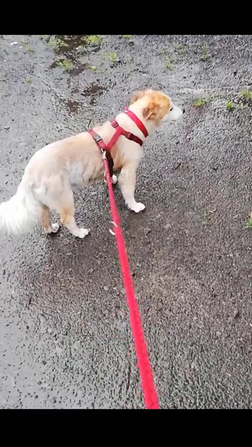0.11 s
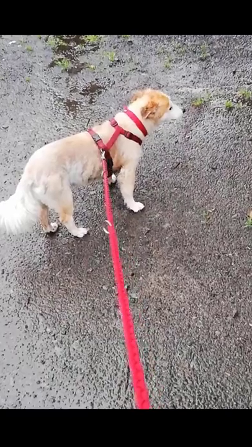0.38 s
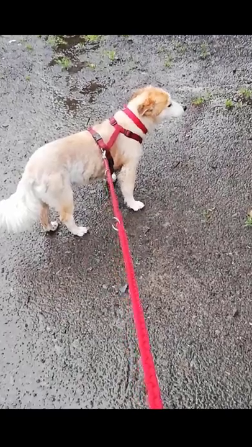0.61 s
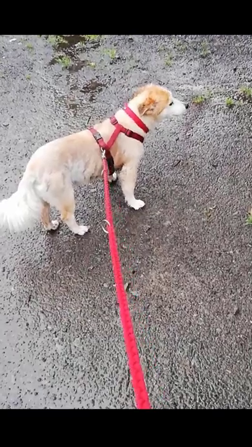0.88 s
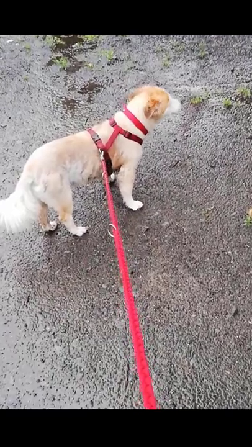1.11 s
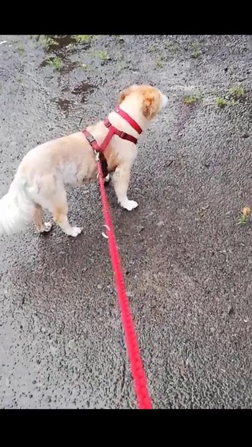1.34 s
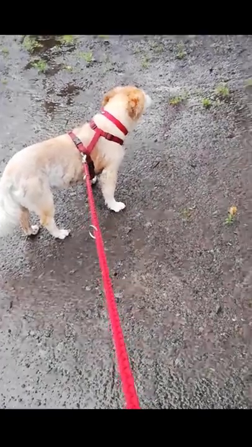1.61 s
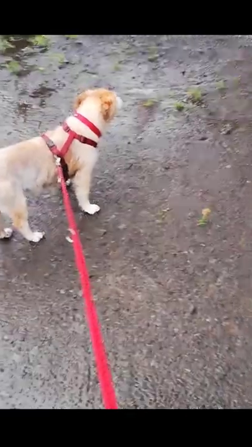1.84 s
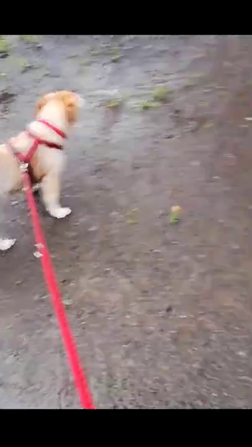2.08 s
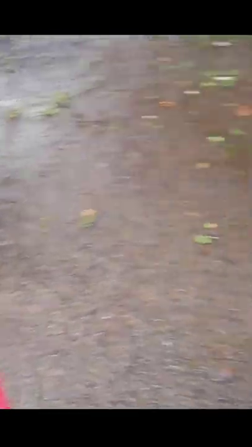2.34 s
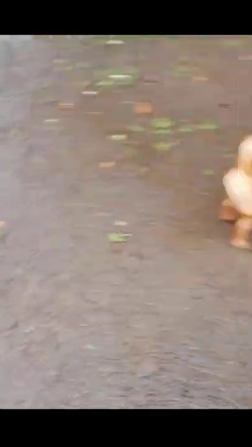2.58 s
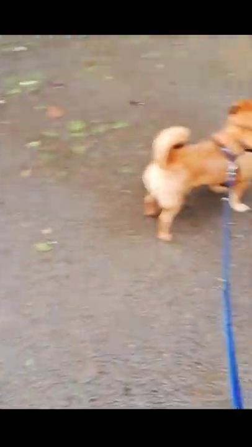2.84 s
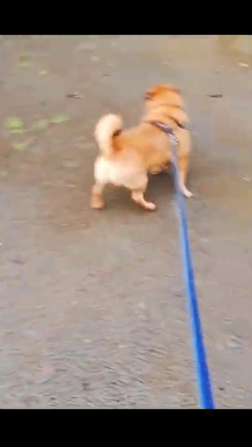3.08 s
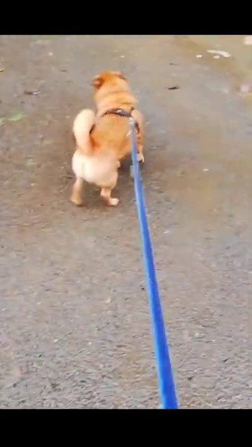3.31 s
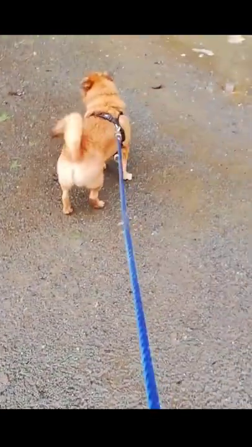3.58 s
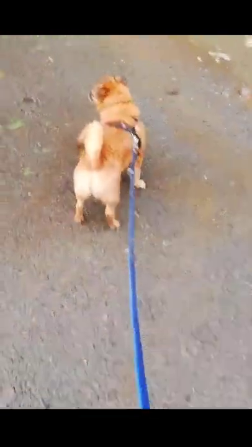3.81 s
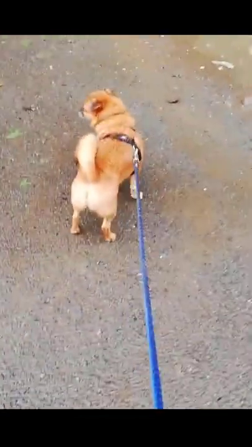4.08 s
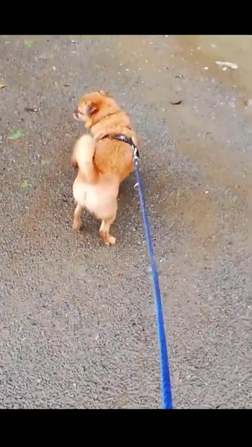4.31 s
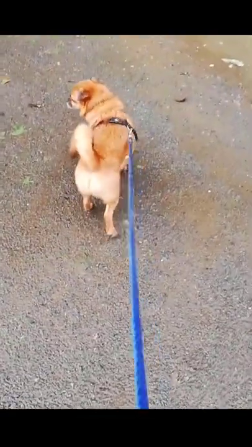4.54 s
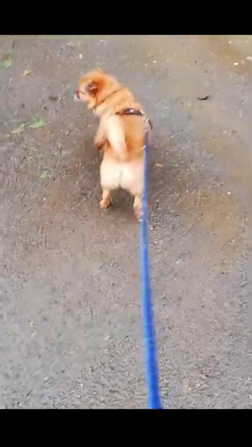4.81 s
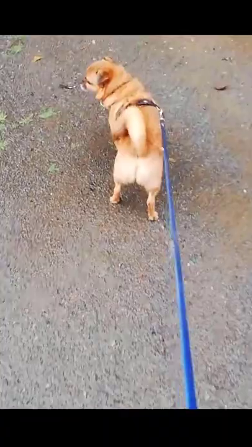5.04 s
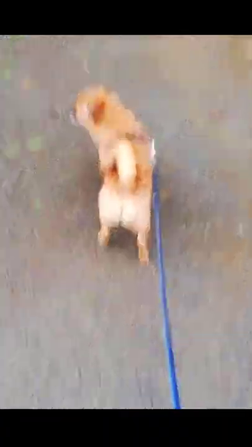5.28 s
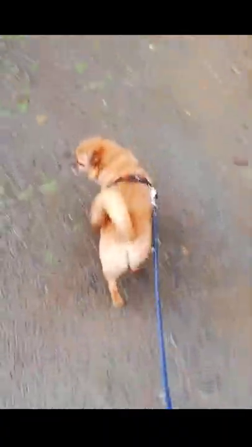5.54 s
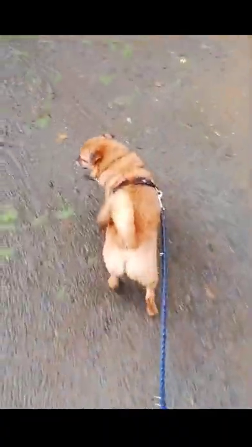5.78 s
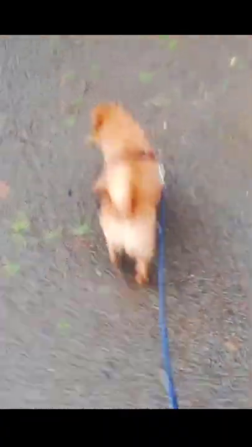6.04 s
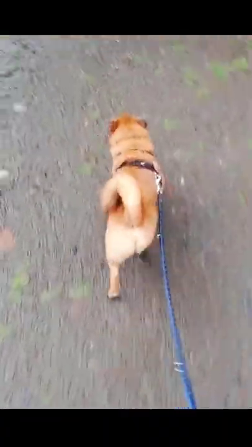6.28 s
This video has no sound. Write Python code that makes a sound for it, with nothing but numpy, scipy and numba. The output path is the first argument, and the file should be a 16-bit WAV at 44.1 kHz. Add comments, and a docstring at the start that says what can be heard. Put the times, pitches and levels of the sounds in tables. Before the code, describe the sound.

Steady rain hisses and patters on wet pavement, with sharp near drop ticks, early handling thumps on the microphone, and a brief low wind rumble late.

```python
"""Rain on wet asphalt

Steady rain around a hand-held phone with two microphone ports: countless far drops are shaped noise and
a patter of grains, near drops tick as short rings with a fizz. Low noise rumbles as air and one gust
buffets the ports. Early on, fingers press on the ports as pressure jumps that drive the limiter, which
ducks the rain; one hard tap follows, and faint low taps come later."""
import sys
import numpy as np
from scipy import signal
from scipy.fft import rfft, irfft, next_fast_len
from scipy.io import wavfile
from scipy.ndimage import uniform_filter1d
from numba import njit

SR = 44100
rng = np.random.default_rng(int(sys.argv[2]) if len(sys.argv) > 2 else 0)


def persist_wave(psi):
    """Save psi, clipped to +-1, as 16-bit WAV."""
    counts = np.round(np.clip(psi, -1, 1) * 32767).astype(np.int16)
    wavfile.write(sys.argv[1], SR, np.atleast_2d(counts).T)


def convert_level_to_amplitude(level_db):
    """Map a level in decibels to its linear amplitude factor."""
    exponent = np.asarray(level_db, float) / 20
    return 10 ** exponent


N = 282237  # samples in the scene
SIZE = next_fast_len(N)  # samples in a noise spectrum
FREQ = np.maximum(np.arange(SIZE // 2 + 1) * SR / SIZE, 1)  # Hz of each bin
PORT_HZ = 9800  # ring of the port cavity

# How the rain swells and dulls. Each row: time in seconds, overall level in dB,
# lift in dB of the bands centred under 2.5 kHz before the overall level is set.
RAIN_LEVELS = [(0.06, -25, 5.5), (0.14, -29.5, 1.5), (0.24, -31, 3.5), (0.5, -30.5, 1), (0.65, -29, 2.5),
               (1.18, -27, 2.5), (1.5, -28, 0.5), (2.0, -26.5, 1.5), (2.5, -27, -0.5), (2.88, -27.5, 0),
               (3.03, -25.5, -2), (3.4, -26.5, 4), (3.7, -27, -1), (4.3, -27, 1), (5.2, -26.5, -0.5),
               (5.6, -28.5, -0.5), (5.96, -24.5, 0), (6.15, -28, 0.5), (6.4, -24.5, -1.5)]
# Brief lifts of the rain hiss around 3.5 kHz: two clear swishes and two slight random swells.
# Each row: centre in seconds, lift in dB, half width in seconds.
MIDDLE_LIFTS = [(1.98, 3.5, 0.074), (3.72, 2, 0.052), (4.5, 1.5, .04), (5.96, 6, 0.036)]
# Tone of the hiss. Each row: frequency in Hz, relative density in dB per Hz.
HISS_TONE = [(150, -12), (250, -6), (360, -6), (519, -3.5), (845, -3.5), (1240, -2), (1530, -2), (1980, -1),
             (2360, -4), (3650, -2.5), (6250, -5), (9490, -3), (11500, -9), (14900, -14.5), (16000, -20)]
# Tilt of the rain between the ports. Each row: frequency in Hz, left minus right in dB.
PORT_TILT = [(200, 1), (480, -4), (820, -2.5), (1500, -3.5), (3000, -1.3), (6500, -1), (9500, 5.5),
             (12000, 0)]
# How alike the ports hear a noise. Each row: frequency in Hz, share of the left noise in the right (0-1).
PORT_LIKENESS = [(40, .985), (130, .96), (300, .74), (600, .54), (1000, .24), (1400, .3), (2500, .08),
                 (9000, .06)]
# How far the right port is ahead. Each row: frequency in Hz, phase lead in radians.
RIGHT_PHASE_LEAD = [(20, 0), (130, .12), (340, .7), (520, 2.6), (730, 3.3), (1290, 6.3), (1700, 6.7)]
# The clearest near drops. Each row: time in seconds, thud envelope peak in dB, thud pitch in Hz,
# edge envelope peak in dB, left minus right in dB.
CLEAR_DROPS = [(0.1459, -29, 2410, -27, -8), (0.222, -11, 1850, -29, -2.5), (0.464, -16.5, 950, -28, -12),
               (0.4881, -24, 5430, -11, -1.5), (0.5567, -10, 1770, -33, -11), (0.6158, -27, 4650, -5, -11),
               (0.6253, -24, 3400, -15, 5), (0.7338, -10, 980, -15, -14.5), (0.8095, -16, 1540, -12, -1),
               (0.8993, -27, 4220, -2.5, 2.5), (1.019, -15, 1630, -9, -1), (1.0964, -12, 1290, -13, -3.5),
               (1.2435, -10.5, 1250, -14, -1.5), (1.332, -12, 960, -25, -14.5),
               (1.4921, -11, 3450, -22, -14), (1.5535, -10.5, 1850, -11, -12), (1.924, -17, 4780, -11, -7),
               (1.9433, -13, 5470, -17, -8), (1.9642, -15, 3700, -16, 0), (1.988, -20, 1290, -7.5, 2.5),
               (2.3541, -9.5, 1110, -20, -9), (2.6008, -15, 930, -24, -10.5),
               (2.8097, -16.5, 950, -22, -7.5), (2.839, -2, 4340, 5, -2.5), (3.0529, -17, 4690, -8, 7),
               (3.0832, -15, 3620, -13, -15), (3.3392, -17, 980, -19, -8.5), (3.44, -12, 1890, -10, -1),
               (3.5459, -31, 4780, -11, 8), (3.6311, -20, 4650, -7, 15.5), (3.7336, -25, 2930, -5, -31),
               (4.0332, -15, 5470, -6.5, -1), (4.1803, -16, 910, -30, -13), (4.23, -7, 3300, -14, -5),
               (4.2598, -7.5, 1720, -29, -12.5), (4.5132, -6, 1420, -23, -2.5), (4.5202, -16, 4610, -11, 1),
               (4.5797, -0.5, 2500, -18, -32), (4.7654, -19, 2150, -5, 2), (4.9698, -3.5, 5470, -9, -16),
               (5.3215, -10, 1590, -18, 1), (5.3369, -11, 1210, -23, -8), (5.4084, -22, 5120, -17, 4),
               (5.4859, -10, 2180, -16, -6), (5.5574, -14, 1610, 1, -18), (5.928, -14, 3140, -16, -14),
               (5.945, -13.5, 860, -16, -16), (6.1914, -14, 3490, -17, -8), (6.2946, -7, 1090, -10, -5),
               (6.3154, -28, 4480, -10, 3.5)]
# Fingers pressing on the ports. Each row: start in seconds, hold in ms, fall in ms,
# left pressure, right pressure (1 = full scale), right lag in ms.
FINGER_PRESSES = [(.026, 22, 2, 1.6, 1.6, .5), (.2470, 7.5, 2.4, 4.3, 5.5, .8), (.2486, .5, .2, 5, 0, 0),
                  (.2504, .3, .2, 4, 0, 0), (.2570, .3, 2.4, 4, 3.2, .7), (.3303, .3, 2.6, 4.4, 5, .6),
                  (.3397, .7, 2.6, 4.2, 5.5, .5)]
# Fingertip taps on the case. Each row: time in seconds, envelope peak in dB, pitch in Hz,
# cycles until that peak, left minus right in dB, left lag in ms.
FINGER_TAPS = [(.5664, -6, 800, 0.49, 0, -0.36), (.5673, 3, 336, 0.3, 5, -0.76),
               (.84, -21, 250, 0.49, 7, 0), (2.352, -23.5, 278, 0.49, 4, 0), (3.32, -24, 238, 0.56, 4, 0)]
# The gust over time. Each row: time in seconds, level in dB.
GUST_LEVELS = [(4.5, -69), (4.74, -33), (4.9, -45), (5.12, -35), (5.28, -36.5), (5.35, -16), (5.39, -22.5),
               (5.48, -20), (5.62, -40), (5.71, -23), (5.8, -36), (6.1, -57)]
# Tone of the gust. Each row: frequency in Hz, relative density in dB per Hz.
GUST_TONE = [(12, -30), (22, -5), (50, 0), (110, 0), (170, -5), (230, -16), (290, -32), (430, -70)]
# Tone of the distant rumble. Each row: frequency in Hz, relative density in dB per Hz.
RUMBLE_TONE = [(13, -36), (22, -5), (70, 4), (97, -1.5), (123, 1.5), (146, -5), (265, -11.5), (400, -13),
               (520, -23), (880, -120)]


def rain():
    """Far drops blend to hiss plus patter through the ports' colour; each band flickers on its own."""
    level_db, dull_db = curve(RAIN_LEVELS)
    t = np.arange(N) / SR
    middle_db = sum(db * np.exp(-((t - s) / half) ** 2) for s, db, half in MIDDLE_LIFTS)
    middle_db = middle_db + 0.73 * walk(12)
    balance = convert_level_to_amplitude(np.outer([0.5, -0.5], over_hz(PORT_TILT)))
    mix = (field() + convert_level_to_amplitude(-8) * patter()) * colour() * balance
    out = 0
    for hz in 220 * 2 ** np.arange(7.):
        # overlapping octave windows that add up to one
        band = np.cos(np.pi / 2 * np.clip(np.log2(FREQ / hz), -1, 1)) ** 2
        extra_db = dull_db if hz < 2500 else middle_db if hz < 5000 else 0
        out = out + irfft(mix * band, SIZE)[:, :N] * convert_level_to_amplitude(extra_db + 0.82 * walk(20))
    return unit(out) * convert_level_to_amplitude(level_db + walk(27.78) + 0.58 * walk(15))


def patter(count=9000):
    """Spectra of middle-distance drops: random grains of about a cycle, a few larger than the rest."""
    when, pitch, size, length = rng.random((count, 4)).T
    side, late = rng.standard_normal((count, 2)).T
    hz = 800 * 14 ** pitch
    size_db = np.minimum(-3.5 * np.log(1 - size), 12.5)
    db = size_db + 15 * np.log10(hz / 3000)
    cycles = 0.5 + 0.9 * length ** 2
    grains = strike(np.c_[when * N / SR, db, hz, cycles, 5 * side, 0.35 * late])
    return rfft(unit(grains), SIZE)


def colour():
    """Gain over frequency: the tone of the hiss with the narrow lift of the port cavity."""
    lift_db, width_hz = 4, 1400
    return convert_level_to_amplitude(over_hz(HISS_TONE) + lift_db / (1 + (2 * (FREQ - PORT_HZ) / width_hz) ** 2))


def near_drops():
    """Each drop thuds at its own pitch, its edge rings the port cavity, and its splash fizzes briefly."""
    s, thud_db, hz, edge_db, pan_db = np.r_[CLEAR_DROPS, stray_drops()].T
    same = np.ones(len(s))
    # in ms: on the whole, the quieter port hears a drop later
    lag = -0.2 * pan_db + 0.154 * rng.standard_normal(len(s))
    thud = strike(np.c_[s, thud_db, hz, 0.55 * same, pan_db, lag])
    edge = strike(np.c_[s, edge_db, PORT_HZ * same, 0.5 * same, pan_db, lag])
    # a softer, longer ring follows the edge
    ring = strike(np.c_[s + 2.5 / PORT_HZ, edge_db - 9, PORT_HZ * same, 2.5 * same, pan_db, lag])
    return thud + edge + ring + splash_fizz(s, np.maximum(thud_db, edge_db), pan_db)


def splash_fizz(s, drop_db, pan_db):
    """Splashes are noise that dies away in a few milliseconds, loudest at the port nearer the drop."""
    fizz_db = np.minimum(drop_db, -7.5)  # harder drops crack louder but fizz no more
    kicks = np.zeros((2, N))
    kicks[:, (s * SR).astype(int)] = convert_level_to_amplitude(fizz_db + 0.5 * np.minimum([pan_db, -pan_db], 0))
    tail = signal.lfilter([1], [1, -np.exp(-1 / (0.0084 * SR))], kicks)  # 8.4 ms decay
    noise = unit(irfft(field() * colour() * (FREQ > 600), SIZE)[:, :N])
    return convert_level_to_amplitude(-16) * tail * noise


def stray_drops(count=50):
    """More near drops fall at random moments, in the columns of CLEAR_DROPS."""
    when, pitch = rng.random((count, 2)).T
    thud, edge, side = rng.standard_normal((count, 3)).T
    hz = 800 * (5400 / 800) ** pitch
    return np.c_[when * (N - 1) / SR, -22 + thud, hz, -15 + edge, -3.5 + 6 * side]


def fingers():
    """Pressure jumps as a port is covered, holds, then leaks away; fingertips tap as short rings."""
    span = N // 8  # all the presses fall in the first eighth
    ms = np.arange(span) / SR * 1e3
    out = np.zeros((2, N))
    for s, hold, fall, left, right, lag in FINGER_PRESSES:
        # the right port rises more slowly: 0.5 ms against 0.06 ms
        for port, (height, late, rise) in enumerate([(left, 0, 0.06), (right, lag, 0.5)]):
            t = ms - s * 1e3 - late
            leak = np.exp(-np.maximum(t - hold, 0) / fall)
            out[port, :span] += height * np.clip(t / rise, 0, 1) * leak
    return out + strike(FINGER_TAPS)


def air():
    """Steady distant rumble and lumpy gusts are low noise, nearly the same at both ports."""
    rumble = unit(irfft(field() * convert_level_to_amplitude(over_hz(RUMBLE_TONE)), SIZE)[:, :N])
    gust = unit(irfft(field() * convert_level_to_amplitude(over_hz(GUST_TONE)), SIZE)[:, :N])
    rumble = rumble * convert_level_to_amplitude(-37 + 0.8 * walk(8))
    return rumble + gust * convert_level_to_amplitude(curve(GUST_LEVELS)[0] + 2.1 * walk(30))


def field():
    """Spectra of a noise pair, alike in the bass, with the right port ahead in phase."""
    a, b = rfft(rng.standard_normal((2, SIZE)))
    share = np.clip(over_hz(PORT_LIKENESS), 0, 1)
    right = share * a + np.sqrt(1 - share ** 2) * b
    return np.array([a, right * np.exp(1j * over_hz(RIGHT_PHASE_LEAD))])


def strike(rows):
    """A struck ring at both ports; rows: s, peak dB, Hz, cycles, left minus right dB, left lag ms."""
    s, db, hz, cycles, pan_db, lag = np.transpose(np.array(rows, float))
    cycles = np.clip(cycles, 0.2, 6)
    left_s = s + np.maximum(lag, 0) / 1e3
    right_s = s - np.minimum(lag, 0) / 1e3
    left = burst(N, left_s * SR, hz, cycles, convert_level_to_amplitude(db + np.minimum(pan_db, 0)))
    right = burst(N, right_s * SR, hz, cycles, convert_level_to_amplitude(db - np.maximum(pan_db, 0)))
    return np.array([left, right])


@njit
def burst(size, start, hz, cycles, peak):
    """Short rings swell and die within a few cycles; each envelope peaks at its start sample."""
    out = np.zeros(size)
    for k in range(len(start)):
        tau = cycles[k] / hz[k] * SR  # samples from onset to envelope peak
        first = start[k] - tau
        for i in range(max(int(first) + 1, 0), min(int(first + 8 * tau), size)):
            u = (i - first) / tau
            out[i] += peak[k] * u * np.exp(1 - u) * np.sin(-2 * np.pi * cycles[k] * u)
    return out


def walk(rate):
    """A wandering level: random values held 1 / rate s and slewed twice; spread near 1."""
    k = int(SR / rate)
    steps = np.repeat(rng.standard_normal(N // k + 1), k)
    return 1.3 * uniform_filter1d(uniform_filter1d(steps, k), k)[:N]


def curve(rows):
    """Value columns of a table over seconds, drawn as lines at every sample."""
    s, *columns = np.transpose(rows)
    return [np.interp(np.arange(N) / SR, s, c) for c in columns]


def over_hz(rows):
    """A (Hz, value) table at every frequency bin, drawn as lines over log frequency."""
    hz, value = np.transpose(rows)
    return np.interp(np.log(FREQ), np.log(hz), value)


def unit(x):
    """Scale to rms 1."""
    return x / np.sqrt(np.mean(x ** 2))


def scene():
    """Rain, near drops, fingers and air add up at the two ports."""
    return rain() + near_drops() + fingers() + air()


@njit
def limit(x, top, grab, hold, release):
    """Linked limiter: a quick follower flattens peaks, a slower one keeps the gain down afterwards."""
    out = np.empty_like(x)
    quick, slow = 0., 0.
    for i in range(x.shape[1]):
        now = max(abs(x[0, i]), abs(x[1, i]))
        quick = max(now, quick * hold)
        slow += (quick - slow) * (grab if quick > slow else release)
        out[:, i] = x[:, i] * (top / max(top, quick, slow))
    return out


def top_cut(x):
    """Nothing passes above the cut-off."""
    return signal.sosfilt(signal.butter(12, 16530, fs=SR, output="sos"), x)


def record(dry):
    """Blocking capacitor (slow undershoot), limiter and top cut; the input opens a moment late."""
    x = signal.lfilter([1, -1], [1, -np.exp(-2 * np.pi * 3.1 / SR)], dry)  # 3.1 Hz low cut
    # 34 ms grab, 1 ms hold, 140 ms release
    x = limit(x, 0.92, 1 / (0.034 * SR), np.exp(-1 / (0.001 * SR)), 1 / (0.14 * SR))
    x = signal.sosfilt(signal.ellip(8, 0.2, 70, 15800, fs=SR, output="sos"), x)
    opened = np.arange(N) > 0.0527 * SR
    mix = np.clip(x * opened, -1, 1)
    return top_cut(mix)


dry = scene()
out = record(dry)
persist_wave(out)
```